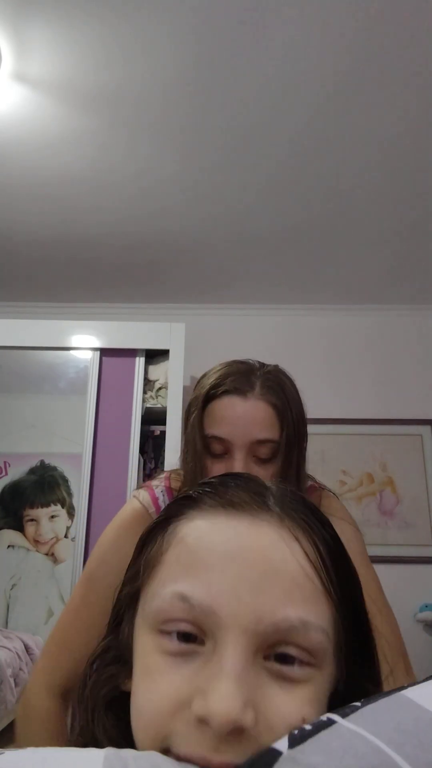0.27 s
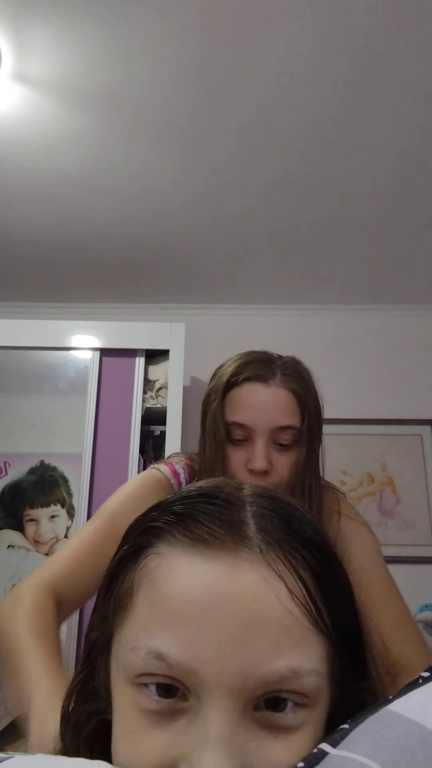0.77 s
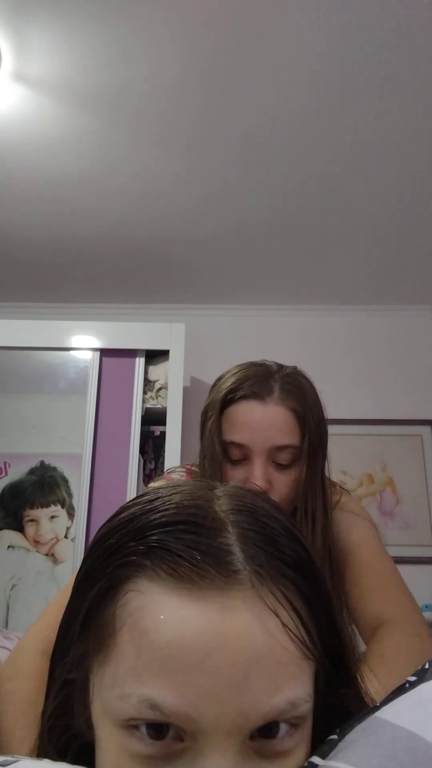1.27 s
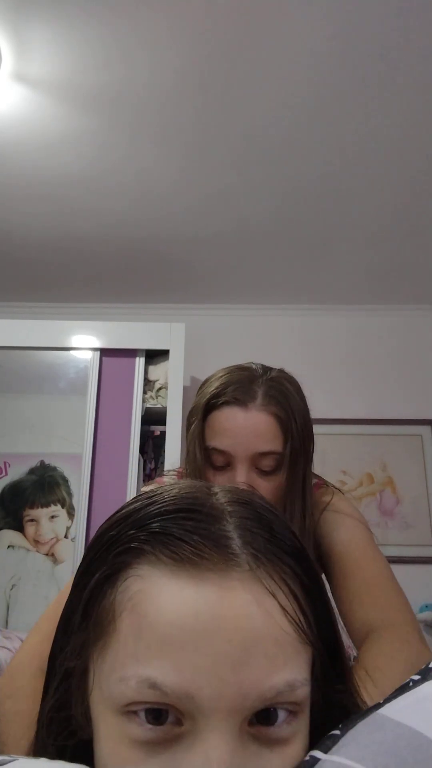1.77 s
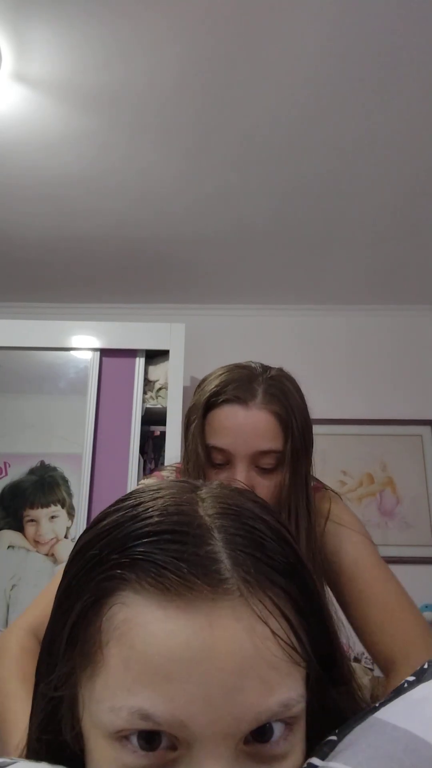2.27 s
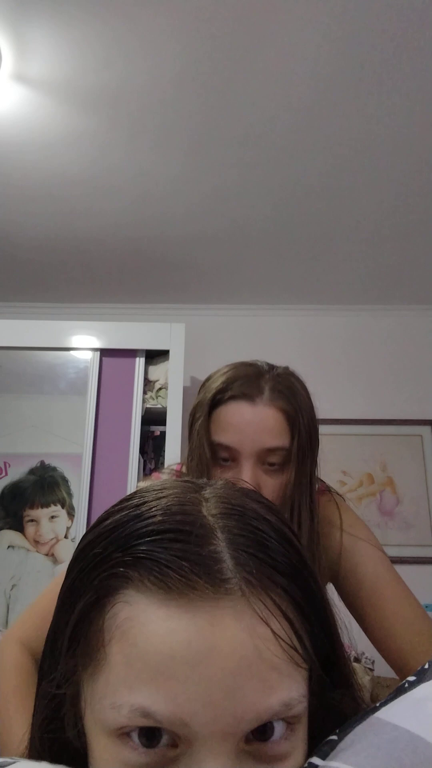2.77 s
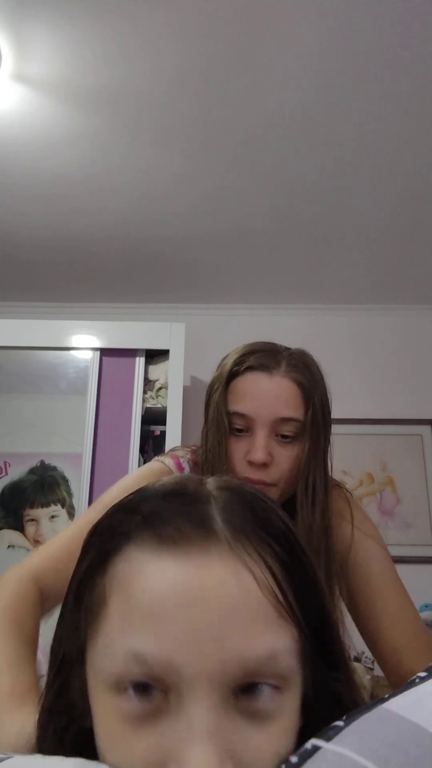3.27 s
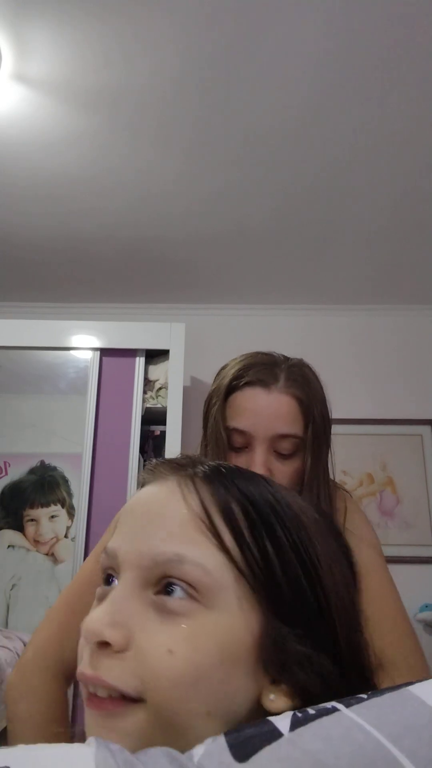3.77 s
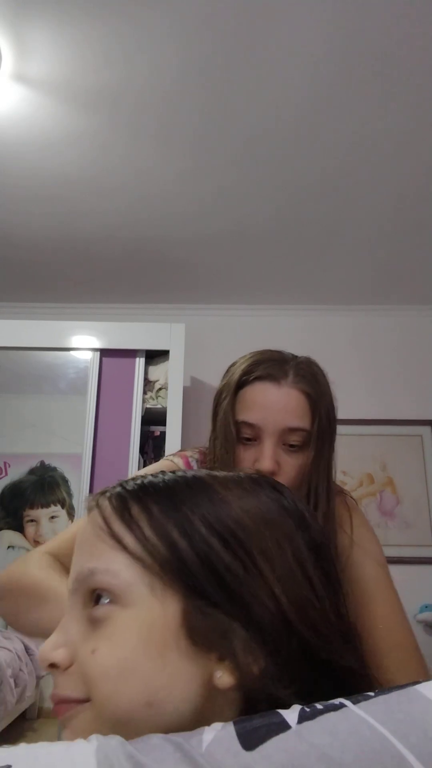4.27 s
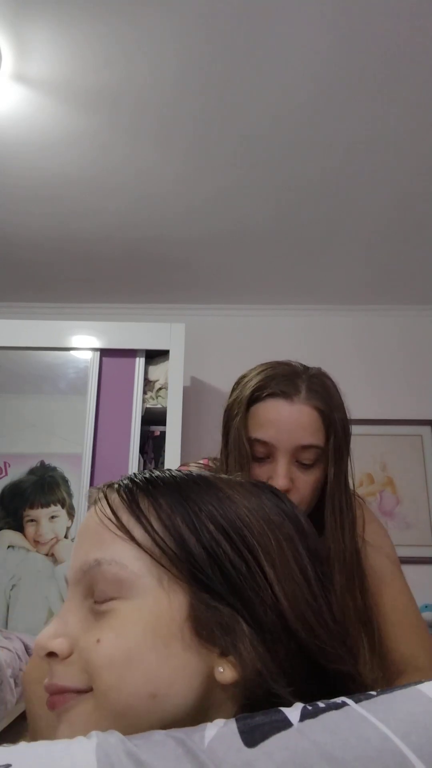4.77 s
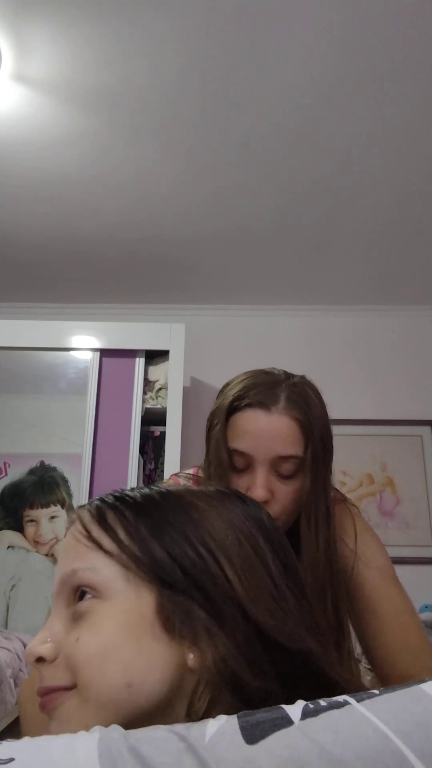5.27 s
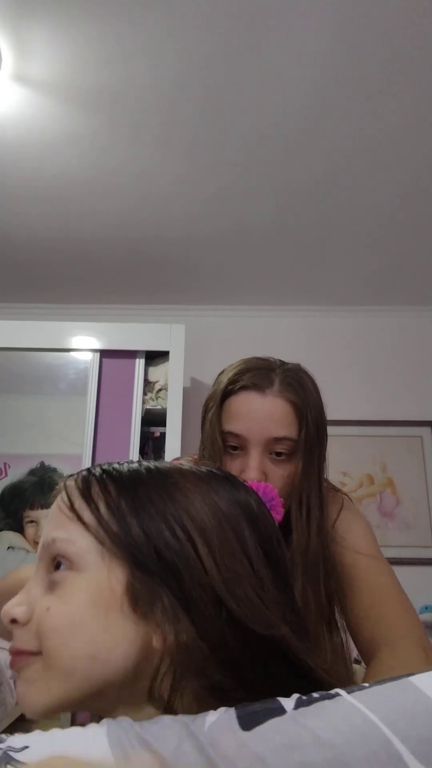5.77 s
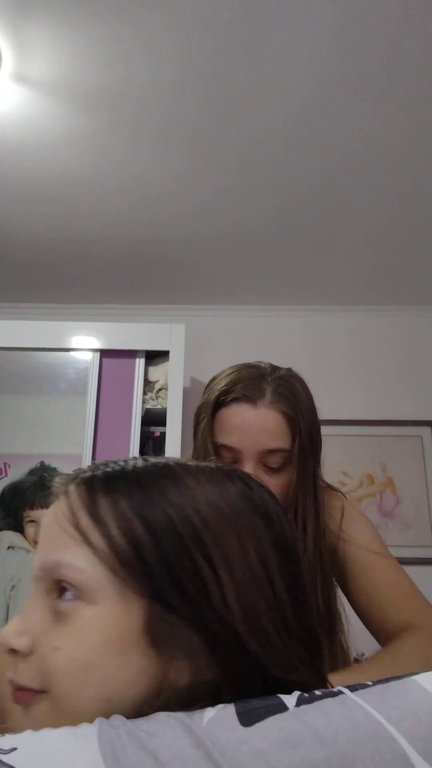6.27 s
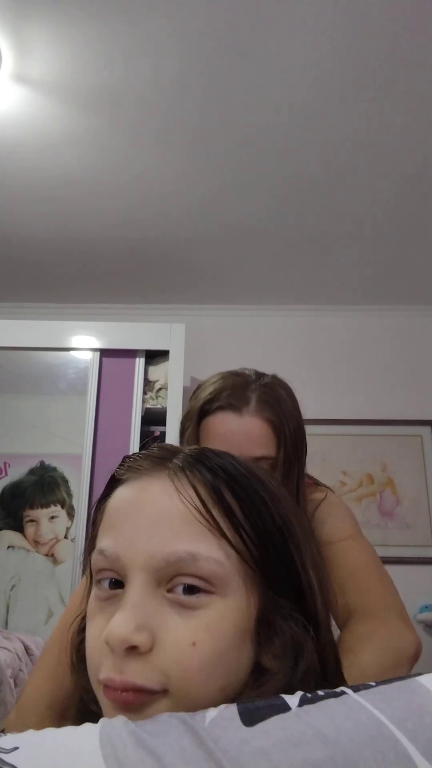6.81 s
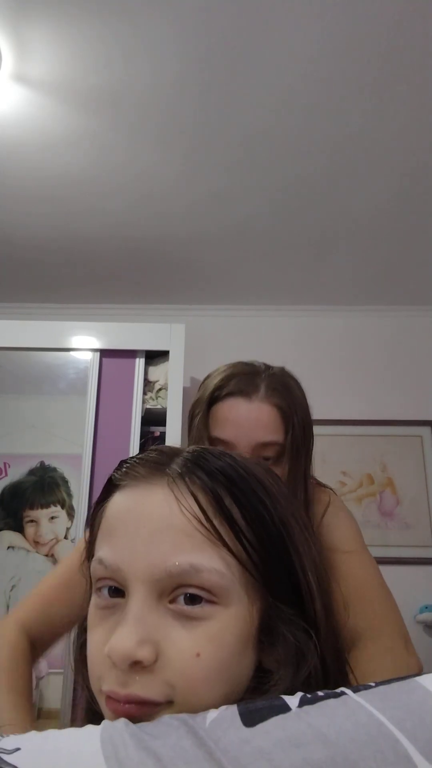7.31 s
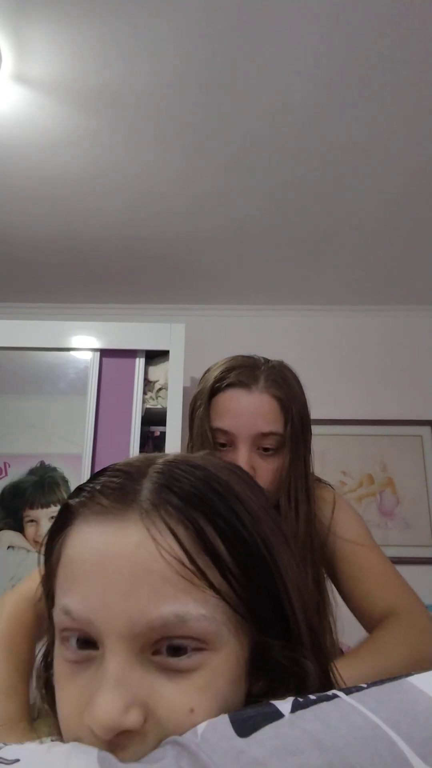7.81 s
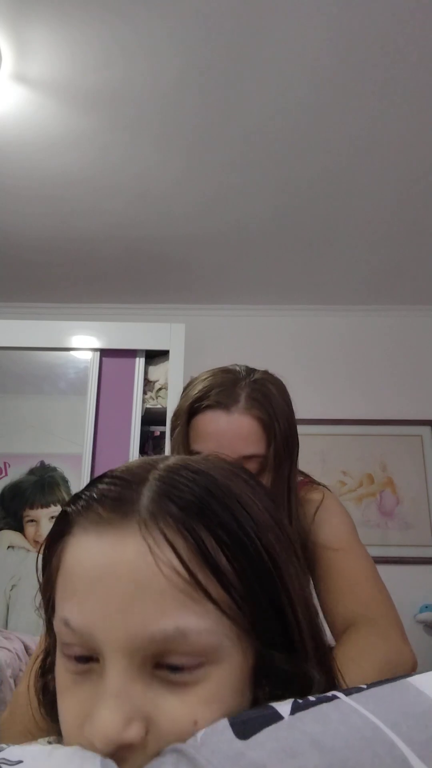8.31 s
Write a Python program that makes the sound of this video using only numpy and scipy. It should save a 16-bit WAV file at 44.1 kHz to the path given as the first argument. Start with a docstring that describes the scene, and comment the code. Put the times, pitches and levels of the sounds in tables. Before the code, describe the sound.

A brush rasps through damp hair in short strokes, with three quick spray hisses and light plastic clicks and knocks.

```python
"""Teeth rasp through damp hair and a hollow brush drones with each pull, close to a phone in a bedroom.
Stick-slip friction of the strands excites the resonances of teeth and brush. A pump bottle hisses
three times as its jet mists the hair. Handling bottle and brush brings plastic ticks, soft knocks
and the rub of sliding hands. Under it lie a short echo, the low rumble of the room and a fine hiss."""
import sys
import numpy as np
from scipy import signal
from scipy.fft import rfft, irfft, next_fast_len
from scipy.io import wavfile
from scipy.ndimage import map_coordinates

SR = 44100
rng = np.random.default_rng(int(sys.argv[2]) if len(sys.argv) > 2 else 0)


def master(y):
    """Save y as 16-bit WAV."""
    cut = np.clip(np.atleast_2d(y).T, -1, 1)
    pcm = np.round(cut * 32767)  # scale
    wavfile.write(sys.argv[1], SR, pcm.astype(np.int16))


N = 376989

# blows of brush and hand, a click then a thud: start_s, thud_db, pitch_hz, click_db, low_re_click_db
BLOWS = [(0.22, -40, 140, -48, -6), (0.7583, -44, 353, -39.5, -13), (2.892, -36.5, 716, -51, -7),
         (3.576, -47.5, 665, -38.5, -4.5), (4.118, -27.5, 223, -55, -8), (5.2724, -34, 343, -31.5, -10),
         (5.3018, -38, 172, -35.5, -6.5), (5.318, -41.5, 339, -46, -5), (5.617, -29, 227, -38, -8),
         (5.912, -30, 286, -33, -14), (6.171, -48, 297, -35, -5), (6.2646, -23.5, 227, -31.5, -3.5),
         (6.862, -34.5, 258, -56, -6), (7.288, -42, 256, -67, -6), (8.163, -34, 350, -29, -3.5),
         (8.1795, -32, 350, -35, -1), (8.195, -32.5, 364, -24, -7.5)]
# spectrum of fizzing strands: frequency_hz, density_db
STRAND_SPECTRUM = [(2500, -26), (4800, -10), (6500, -7.5), (8000, -4), (9300, -0.5), (11200, -1.5),
                   (12500, -5), (16000, -16.5)]


def combing(body_db=0.5, rasp_db=-6, rustle_db=-8, run_out=0.084, teeth_lag=0.88, teeth_bite=0.13):
    """Stick-slip friction: strands drive the hollow brush, ring the teeth and fizz as they run out."""
    # pulls, dull on the scalp and bright at the ends: peak_s, length_s, level_db, brightness_db
    pulls = [(0.14, 0.12, -61, -9), (0.234, 0.069, -46.5, -1.5), (0.282, 0.069, -48, 6.5),
             (0.817, 0.04, -51.5, -1), (0.922, 0.049, -60, -3.5), (1.39, 0.046, -73, -11),
             (1.92, 0.23, -62.5, -2.5), (2.012, 0.073, -48, -3.5), (2.53, 0.19, -51.5, -6.5),
             (2.925, 0.087, -57, -5), (3.278, 0.09, -51.5, -1), (3.459, 0.12, -53, -1.5),
             (3.625, 0.087, -60, 4), (3.86, 0.058, -60.5, 3), (3.972, 0.11, -54.5, -5),
             (4.32, 0.068, -54.5, 5.5), (4.695, 0.06, -59.5, 0.5), (5.806, 0.069, -44, 6.5),
             (5.915, 0.12, -50.5, 0), (6.634, 0.066, -66.5, 6), (6.872, 0.075, -46.5, -2),
             (7.3, 0.073, -53, -7), (7.34, 0.087, -54, -4.5), (7.642, 0.04, -46.5, 5.5),
             (7.745, 0.08, -54, 2), (7.94, 0.11, -55.5, 1), (8.407, 0.063, -54, -7)]
    # resonances of the hollow brush and of its teeth: centre_hz, width_hz, level_db
    brush_modes = [(130.4, 22, 1), (250.3, 23.2, 5.5), (371, 42, -1.5), (471.7, 31.5, 2), (610, 147, -2.5),
                   (725, 54, 2), (852, 100, -5.5)]
    teeth_modes = [(1008, 460, -1), (1285, 43, 2.5), (1655, 123, -1), (2160, 115, 3), (2856, 62, 1.5),
                   (3286, 330, -4.5), (4176, 230, 5)]
    # hair dragged over the scalp: frequency_hz, density_db
    scalp_spectrum = [(400, -11), (1000, -1.5), (2500, 8), (4500, 3), (8000, -48)]
    out, n = np.zeros((2, N)), SR // 2
    t = np.arange(n) / SR - .2  # zero at the peak of the pull
    for peak, length, db, bright_db in pulls:
        lag = run_out * length  # the fizz trails the drone
        tugs, catches, hairs = slips(700, 2.4, .5, n), slips(500, 2.7, .7, n), slips(5000, 2.8, 1.2, n)
        brush = resonated(tugs, regripped(brush_modes, detune=0.016, scatter_db=2.0))
        teeth = resonated(catches, regripped(teeth_modes, detune=0.067, scatter_db=3.0))
        drone = placed(brush, alike=0.71, left_db=1.2)
        rasp = placed(teeth, alike=0.073, left_db=2.0)
        rustle = placed(coloured(slips(600, 5.7, 1.0, n), scalp_spectrum), alike=0.1, left_db=0.5)
        fizz = placed(coloured(hairs, STRAND_SPECTRUM), alike=0.05, left_db=5.0)
        scrape = amp(rasp_db) * rasp + amp(rustle_db) * rustle
        pull = amp(db + body_db - bright_db) * swell(t, length) * drone
        pull += amp(db + teeth_bite * bright_db) * swell(t - teeth_lag * lag, length) * scrape
        pull += amp(db + bright_db) * swell(t - lag, length) * fizz
        add(out, peak + t[0], pull)
    return out


def swell(t, length, rise_share=0.36, roundness=1.114):
    """Friction noise follows speed: a pull gathers quickly and eases off more slowly."""
    width = length * np.where(t < 0, rise_share, 1 - rise_share)
    return np.exp(-np.abs(t / width) ** roundness)


def slips(per_second, spread_db, smooth, size=N):
    """Stick-slip excitation in three rows: tiny random jolts over the smooth rub of many strands."""
    slipping = rng.random(size) < per_second / SR
    jolts = slipping * amp(spread_db * np.minimum(rng.exponential(size=size), 3))
    return unit(unit(jolts * rng.standard_normal((3, size))) + smooth * rng.standard_normal((3, size)))


def regripped(modes, detune, scatter_db):
    """Loading by the hand: a new grip shifts each resonance a little in pitch and strength."""
    return [(hz * np.exp(detune * rng.normal()), width, db + scatter_db * rng.normal())
            for hz, width, db in modes]


def spray(shutoff_s=0.01, sag_db=2):
    """Jet turbulence: the nozzle hisses and sputters while the pump's pressure sags, then shuts off."""
    # presses of the pump: start_s, rise_s, length_s, level_db
    squirts = [(2.056, 0.031, 0.09, -32.5), (2.526, 0.022, 0.086, -33), (2.972, 0.02, 0.095, -30)]
    # hiss of the nozzle: frequency_hz, density_db
    mist_spectrum = [(500, -36), (1200, -37), (1700, -24), (2300, -17), (3100, -19.5), (4600, -15),
                     (5300, -10.5), (6400, -12.5), (7500, -7.5), (9200, -3), (11300, -2), (12300, -3.5),
                     (16000, -14.5)]
    t, flow = np.arange(SR // 4) / SR, np.zeros(N)
    for start, rise, length, db in squirts:
        opening = np.clip(t / rise, 0, 1) * np.exp(-np.maximum(t - length, 0) / shutoff_s)
        add(flow, start, opening * amp(db + sag_db * (.5 - t / length)))
    jet = placed(noise(mist_spectrum), alike=0.71, left_db=4.0) * amp(0.42 * wobble(200))
    return mirrored(flow * sideways(jet, lag_s=0.00012), delay_s=0.0009, share=0.066)


def ticks(ring_t60=0.022, crack_t60=0.0018, ping_t60=0.023, ping_hz=2600, ping_spread=.17,
          crack_db=1, ring_db=-5, low_db=4, ping_db=-8):
    """Impulse response: a snap is a bright crack and a brief ring, with a low click and a tooth's ping."""
    # bright and low parts of a click: frequency_hz, density_db
    bright_spectrum = [(1500, -16), (4500, -16), (7000, 2), (9200, 5.5), (11500, 1.5), (16000, -11)]
    low_spectrum = [(300, -1), (900, -5), (1400, -13.5), (2200, -8), (3000, -8.5), (4000, -9), (5500, -17),
                    (9000, -32)]
    t = np.arange(SR // 20) / SR
    bright, low, ping = np.zeros((3, N))
    ring = amp(-60 * t / ring_t60) * (1 - np.exp(-t / .0004))
    crack = amp(-60 * t / crack_t60)
    for start, db, low_share_db in snap_events():
        add(bright, start, amp(db + crack_db) * crack + amp(db + ring_db) * ring)
        add(low, start, amp(db + low_share_db + low_db) * ring)
        tooth_hz = ping_hz * np.exp(ping_spread * rng.normal())
        ping_decay = amp(db + low_share_db + ping_db - 60 * t / ping_t60)
        add(ping, start, ping_decay * np.sin(2 * np.pi * tooth_hz * t))
    snaps = bright * noise(bright_spectrum) + low * noise(low_spectrum) + ping
    return mirrored(placed(snaps, alike=0.31, left_db=9.5), delay_s=.0014, share=0.12)


def snap_events(strays_per_s=2.5, stray_db=-49.5, stray_low_db=-11.5, spread_db=2.5):
    """Impulsive sources: snapping plastic, the clicks of the blows, and single wet strands at random."""
    # teeth and plastic parts snapping: start_s, level_db, low_re_click_db
    plastic_snaps = [(0.69, -52.5, -4.5), (1.036, -50, -20), (1.1172, -39.5, -8.5), (2.0312, -30.5, -30),
                     (2.283, -39, -37), (2.4, -40.5, -20), (2.515, -35, -31), (2.7066, -39, -31),
                     (2.7546, -65, 4.5), (2.8452, -52, -7.5), (2.9024, -42, -23), (3.1901, -42.5, -17),
                     (4.156, -39.5, -24), (4.271, -44, -15), (4.2815, -33, -10), (4.7197, -39.5, -11.5),
                     (5.291, -37, -14), (5.882, -35, -2.5), (5.966, -25, -35), (5.9992, -36.5, -8.5),
                     (6.166, -35.5, -39), (6.256, -37, -23), (8.5283, -47, -4)]
    clicks = [(start, db, low_db) for start, _, _, db, low_db in BLOWS]
    gap, size, colour = rng.standard_normal((200, 3)).T
    times = np.cumsum(np.exp(gap - .5) / strays_per_s)
    strays = zip(times, stray_db + spread_db * size, stray_low_db + spread_db * colour)
    return list(plastic_snaps) + clicks + list(strays)


def knocks(level_db=2, attack_s=0.00065, give_s=0.0011, soft_hz=900, left_db=5):
    """Damped modes: the padding gives for a moment, then the object rings at a pitch set by the grip."""
    # modes of the struck object: pitch_ratio, level_db, t60_s
    modes = [(1.002, -2, 0.063), (1.5, -6, 0.037), (2.2, -8.5, .022), (3, -20, 0.018)]
    t, thuds = np.arange(SR // 6) / SR, np.zeros(N)
    for start, db, hz, _, _ in BLOWS:
        ring = sum(amp(mode_db + rng.normal() - 60 * t / t60) * np.sin(2 * np.pi * hz * ratio * t)
                   for ratio, mode_db, t60 in modes)
        add(thuds, start + give_s, -amp(db + level_db) * ring * (1 - np.exp(-t / attack_s)))
    # small objects radiate little bass, and the padding takes off the treble
    thin = signal.sosfilt(signal.butter(2, 150, "highpass", fs=SR, output="sos"), thuds)
    soft = signal.sosfilt(signal.butter(4, soft_hz, fs=SR, output="sos"), thin)
    return soft * amp([[left_db / 2], [-left_db / 2]])


def sliding(cloth_db=-56, rub_db=-58.5, fizz_db=-51, cloth_growth=0.68, rub_growth=0.93):
    """Sliding friction of hands on bedding, plastic and hair: a firmer touch is louder and brighter."""
    # hands shifting on the bedding: frequency_hz, density_db
    bedding_spectrum = [(60, -10), (125, 0.5), (165, -9.5), (225, 3), (350, -1.5), (430, -7), (550, -5),
                        (750, -6.5), (1000, -13), (2000, -59)]
    # resonances of the plastic under the fingers: centre_hz, width_hz, level_db
    plastic_modes = [(1174, 43, 4.5), (1575, 160, 2.5), (2157, 270, 3), (2800, 590, 2), (3540, 780, 1),
                     (4270, 255, 4.5), (4940, 120, 4)]
    unsteady_db = wobble(40)
    touch = touch_db(on_plastic=False) + unsteady_db
    grip = touch_db(on_plastic=True) + unsteady_db
    folds, skin, hairs = slips(300, 3, 1.0), slips(700, 4.5, 1.66), slips(2000, 5, 1.4)
    cloth = placed(coloured(folds, bedding_spectrum), alike=1.0, left_db=3) * amp(0.48 * wobble(14))
    rub = placed(resonated(skin, plastic_modes), alike=0.14, left_db=3.0) * amp(0.71 * wobble(21))
    fizz = placed(coloured(hairs, STRAND_SPECTRUM), alike=0.028, left_db=6.5)
    return (amp(cloth_db + cloth_growth * touch) * cloth
            + amp(rub_db + rub_growth * grip) * rub
            + amp(fizz_db + touch) * mirrored(fizz, delay_s=0.0023, share=0.11))


def touch_db(on_plastic, attack_s=0.024, release_s=.11, sag_db_per_s=9, rest_db=-73.5, firm_db=-50.5):
    """Incoherent addition: slides and the resting touch sum in power, given in dB re a firm slide."""
    # slow slides of the hands: start_s, length_s, level_db, extra_on_plastic_db
    slides = [(-0.03, 0.037, -55, -3), (0.742, 0.057, -53, 1.5), (1.039, 0.4, -60.5, -2.5),
              (3.793, 0.4, -64, 2.5), (4.306, 1, -64.5, -1.5), (5.261, 0.25, -50, -1),
              (5.622, 0.32, -51.5, -3), (6.042, 0.41, -58.5, 0.5), (6.74, 0.22, -67, -5),
              (7.996, 0.12, -58.5, 1), (8.12, 0.2, -52, 2.5)]
    t, power = np.arange(N) / SR, amp(rest_db) ** 2
    for start, length, db, plastic_db in slides:
        age = t - start
        gate = np.clip(age / attack_s, 0, 1) * np.exp(-np.maximum(age - length, 0) / release_s)
        sag_db = sag_db_per_s * np.clip(age, 0, length)  # the hand slows
        power = power + (gate * amp(db + on_plastic * plastic_db - sag_db)) ** 2
    return 10 * np.log10(power) - firm_db


def bedroom(x):
    """Reverberation: the walls answer with a short diffuse tail that decays exponentially."""
    # reverberation times: frequency_hz, t60_s
    decay_times = [(150, 0.2), (1000, 0.75), (5000, 0.37), (10000, 0.35), (16000, 0.2)]
    hz, t, spectra = signal.stft(rng.standard_normal((2, SR // 2)), SR, nperseg=256)
    decay = amp(-60 * t / along(decay_times, hz)[:, None])
    tail = signal.istft(spectra * decay, SR, nperseg=256)[1]
    response = np.pad(tail / np.linalg.norm(tail[0]), ((0, 0), (SR // 200, 0)))  # 5 ms late
    return signal.fftconvolve(x, response, axes=1)[:, :N]


def room_tone(level_db=-58):
    """Ambient noise floor: the quiet rumble of the house and a fine hiss."""
    # rumble and hiss: frequency_hz, density_db
    floor_spectrum = [(4, 7), (12, 10), (25, -1.5), (45, -9), (62, -0.5), (85, -13), (125, -7), (170, -15),
                      (300, -14.5), (700, -33), (2000, -32.5), (8000, -44)]
    return amp(level_db) * placed(noise(floor_spectrum), alike=0.57, left_db=0)


def resonated(x, modes):
    """Modal superposition: x drives band-limited resonances of alternating sign, at rms 1."""
    def response(f):
        bank = sum((-1) ** k * amp(db) * 1j * f * width / (hz * hz - f * f + 1j * f * width)
                   for k, (hz, width, db) in enumerate(modes))
        highpass = 1j * f / (1j * f + modes[0][0] / 2)
        return bank * highpass / (1 + (f / (1.08 * modes[-1][0])) ** 4)
    return unit(filtered(x, response))


def placed(three, alike, left_db):
    """Partial coherence: stereo from one row shared by both microphones and one row for each."""
    gains = unit(amp([[left_db / 2], [-left_db / 2]]))
    return gains * (np.sqrt(alike) * three[0] + np.sqrt(1 - alike) * three[1:])


def sideways(x, lag_s):
    """Path difference: the sound reaches the left microphone lag_s after the right one."""
    return filtered(x, lambda hz: np.exp(-1j * np.pi * hz * np.array([[lag_s], [-lag_s]])))


def mirrored(x, delay_s, share):
    """Comb filtering: the reflection from a nearby surface interferes and makes the sound hollow."""
    return filtered(x, lambda hz: (1 + share * np.exp(-2j * np.pi * hz * delay_s)) / np.hypot(1, share))


def noise(spectrum):
    """Three independent rows of coloured Gaussian noise."""
    return coloured(rng.standard_normal((3, N)), spectrum)


def coloured(x, spectrum):
    """Spectral shaping of x, at rms 1."""
    return unit(filtered(x, lambda hz: amp(along(spectrum, hz))))


def filtered(x, response):
    """Linear filtering: the spectrum of x times a frequency response."""
    n = x.shape[-1]
    padded = next_fast_len(n + SR // 8)
    return irfft(rfft(x, padded) * response(np.fft.rfftfreq(padded, 1 / SR)), padded)[..., :n]


def wobble(rate):
    """Random modulation: a smooth curve with rate knots a second."""
    return map_coordinates(rng.standard_normal(int(N * rate / SR) + 4), [np.arange(N) * rate / SR])


def along(points, hz):
    """Interpolation of (frequency_hz, value) points on a log axis."""
    frequencies, values = np.transpose(points)
    return np.interp(np.log(hz + 1), np.log(frequencies + 1), values)


def add(track, start_s, sound):
    """Superposition of a sound on a track."""
    part = track[..., max(round(start_s * SR), 0):][..., :sound.shape[-1]]
    part += sound[..., :part.shape[-1]]


def amp(db):
    """Decibels to gain."""
    return 10 ** (np.asarray(db) / 20)


def unit(x):
    """Normalisation to rms 1."""
    return x / np.sqrt(np.mean(x ** 2) + 1e-20)


def scene(hands_wet_db=-18, comb_wet_db=-13, spray_wet_db=-13):
    """Direct-to-reverberant ratio: the hands, near and to the left, are drier than brush and bottle."""
    hands = sideways(sliding() + ticks() + knocks(), lag_s=-0.000208)
    comb, mist = combing(), spray()
    echo = bedroom(amp(hands_wet_db) * hands + amp(comb_wet_db) * comb + amp(spray_wet_db) * mist)
    return hands + comb + mist + echo + room_tone()


def record(dry, top_hz=16000):
    """Frequency response: the microphones differ in the treble; the phone keeps nothing above top_hz."""
    # the left microphone hears more of the top octave: frequency_hz, left_minus_right_db
    imbalance = [(9000, -0.5), (11000, 0.5), (13000, 0.5), (16000, 11.5)]
    sides = np.array([[.5], [-.5]])
    return filtered(dry, lambda hz: amp(along(imbalance, hz) * sides) * (hz < top_hz))


dry = scene()
out = record(dry)
master(out)
```